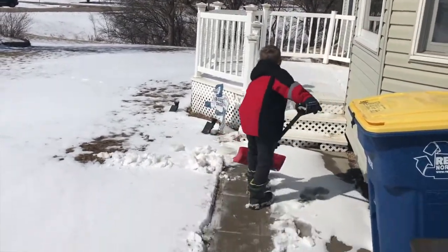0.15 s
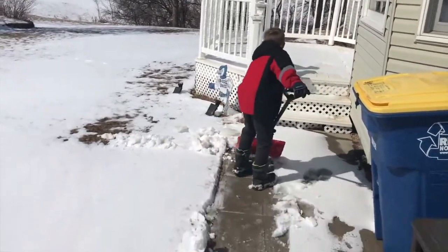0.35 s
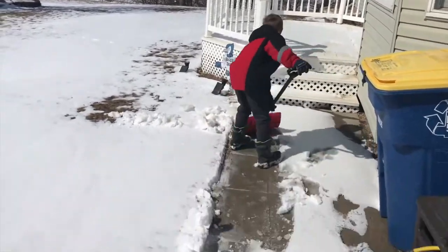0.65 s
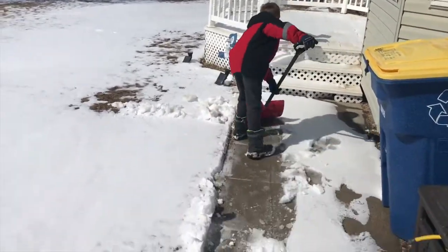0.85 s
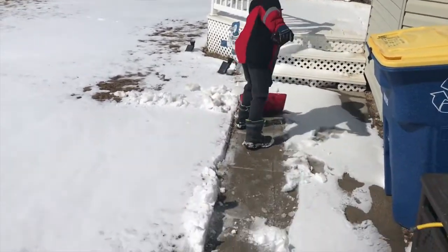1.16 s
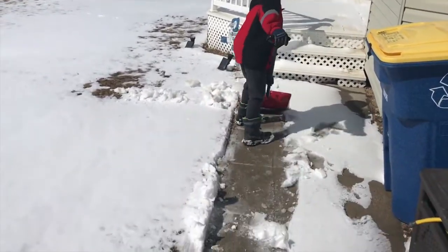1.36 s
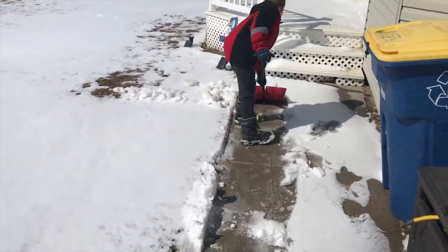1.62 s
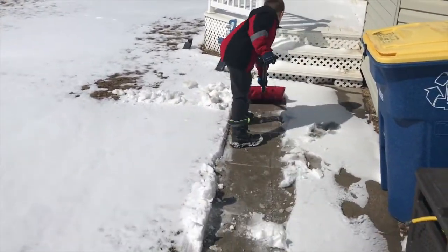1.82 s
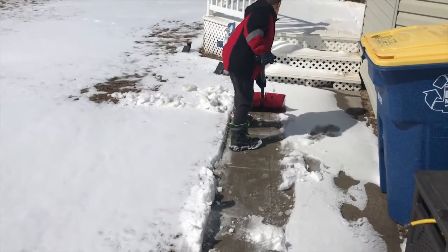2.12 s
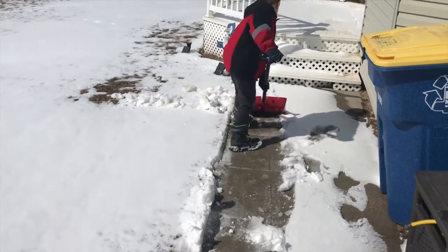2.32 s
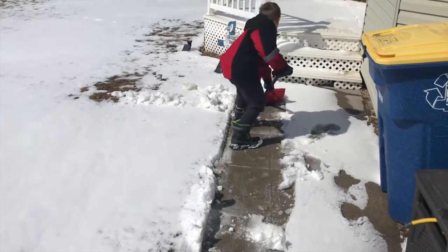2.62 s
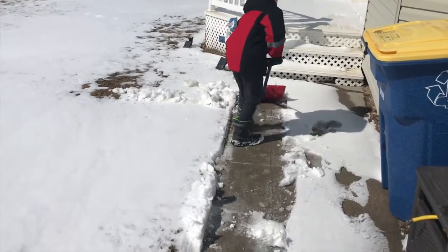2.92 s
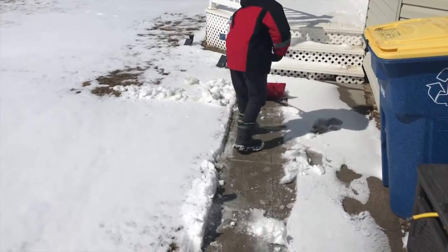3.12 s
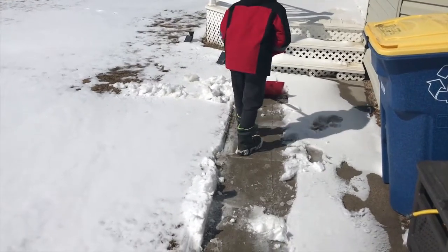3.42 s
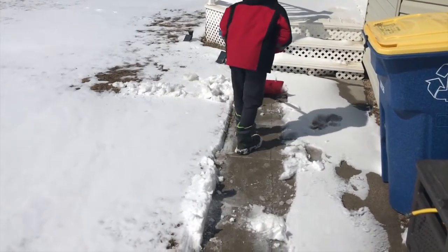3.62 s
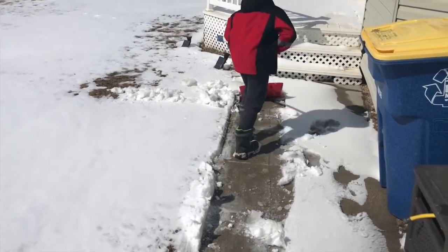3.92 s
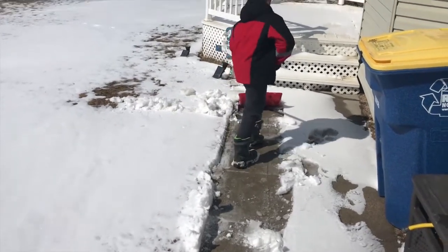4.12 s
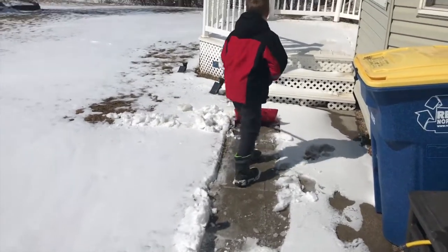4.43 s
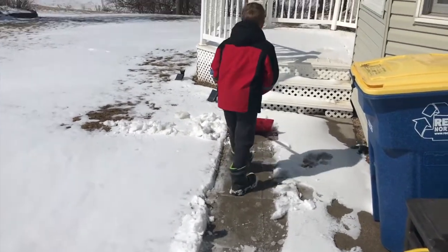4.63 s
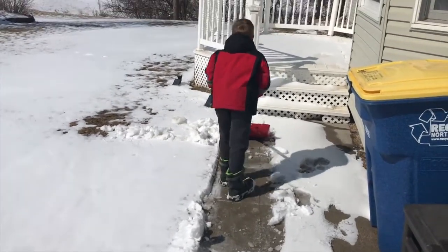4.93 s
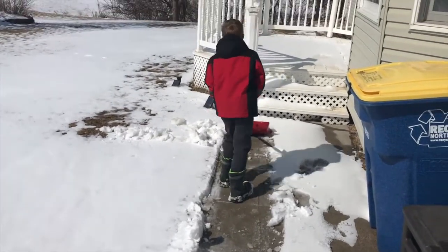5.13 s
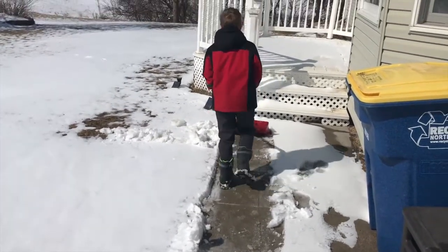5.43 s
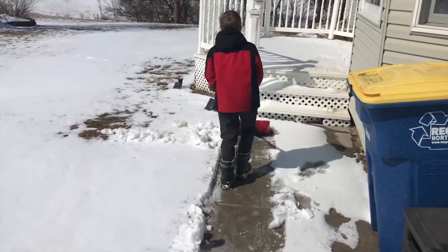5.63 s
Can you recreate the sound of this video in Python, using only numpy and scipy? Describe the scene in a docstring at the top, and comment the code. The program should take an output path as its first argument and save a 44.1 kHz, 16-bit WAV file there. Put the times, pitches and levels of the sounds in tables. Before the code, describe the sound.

A plastic snow shovel scrapes and knocks over rough concrete in short strokes, then quiet snow shuffles, a wind buffet and two weaker scrapes.

```python
"""A concrete path beside a house: a plastic snow shovel is scraped and dragged in short strokes, a few metres off.
Grit under the edge is a stream of random impulses that excites the damped modes of the blade; where the edge
catches on bumps, a tick and decaying chatter excite them too. Lighter shuffles through the snow crunch between
the strokes, short reflections follow, and a breeze buffets the microphone as low filtered noise with
single sinking swirls, over a faint outdoor hush of nearly steady noise."""
import sys
import numpy as np
from scipy import signal
from scipy.fft import rfft, irfft
from scipy.io import wavfile
from scipy.ndimage import uniform_filter1d

SR = 44100
rng = np.random.default_rng(int(sys.argv[2]) if len(sys.argv) > 2 else 0)


def wav_record(signal):
    """Record a signal, one row per channel, as 16-bit PCM in the file named by sys.argv[1]."""
    frames = np.transpose(np.atleast_2d(signal))
    bounded = np.clip(frames, -1, 1)
    # unit amplitude maps onto the largest positive 16-bit level
    quanta = np.round(bounded * 32767).astype(np.int16)
    wavfile.write(sys.argv[1], SR, quanta)


def volts(x):
    """Linear amplitude factor 10**(x/20) for a level x in dB, scalar or array-like."""
    e = np.asarray(x, float) / 20
    return 10 ** e


N = 254016

# the edge catching on bumps: (time [s], rattle level [dB], boom and knock above it [dB],
# grit above it [dB], most excited frequency [Hz])
CATCHES = [(0.066, -43, -1, 0, 2100), (0.297, -41, -8, 1.5, 2280), (0.526, -26.5, 1, -3, 260),
           (0.554, -23, 1, -7, 640), (0.607, -28, 5.5, -15, 387), (0.667, -13, -10, -8.5, 1120),
           (0.699, -20.5, 0.5, -25, 260), (0.78, -42, 2.5, -2, 340), (1.113, -33.5, 1, -18, 288),
           (1.148, -33, 0, -20, 603), (1.206, -36.5, 9.5, 4.5, 312), (1.509, -40.5, 0, -7, 980),
           (1.558, -17.5, -11, -13, 620), (1.601, -11, -1.5, -4, 260), (1.667, -13, -35, -8, 342),
           (1.699, -21.5, -2, 2, 310), (1.839, -37.5, -1.5, -2, 256), (2.115, -33, 6.5, -9, 990),
           (2.242, -32, -3, -3.5, 950), (2.286, -12, -16.5, -9.5, 1060), (2.355, -41, 8, -9, 343),
           (2.468, -23.5, 6, -8, 368), (2.496, -17.5, 4, -10, 322), (2.52, -23, -13, -25, 417),
           (2.549, -22.5, -1, -5, 378), (2.578, -21.5, -10, 1, 610), (2.647, -34.5, 2, -13, 1310),
           (2.953, -38.5, -9, -13, 242), (3.037, -42, -17, 8, 902), (3.214, -39, -11, 2, 242),
           (4.021, -42.5, -4, -18, 686), (4.115, -43.5, -23, 4.5, 1630), (4.911, -35.5, -17, -6, 1000),
           (5.079, -40, -11, -3, 1870), (5.117, -32.5, 0, -14, 381), (5.134, -33, -7, -1, 1030),
           (5.177, -29, -25, -3, 1870), (5.223, -29, -9, 1.5, 1900), (5.478, -46.5, -7, -8, 1910),
           (5.535, -48, -17, -17, 670), (5.651, -41.5, 2, -6, 440), (5.698, -41, -6, -4, 1370)]


def level(x):
    """Normalisation by effective value: scales a signal to rms 1."""
    return x / np.sqrt(np.mean(x ** 2))


def colour(x, points):
    """Minimum-phase filtering: the folded cepstrum of the log gain yields a causal response through (Hz, dB)."""
    hz, db = np.transpose(points)
    size = 8192
    grid = np.maximum(np.fft.rfftfreq(size, 1 / SR), 1)
    log_gain = np.log(volts(np.interp(np.log(grid), np.log(hz), db)))
    cepstrum = irfft(log_gain)
    cepstrum[1:size // 2] *= 2
    cepstrum[size // 2 + 1:] = 0
    response = irfft(np.exp(rfft(cepstrum)))
    return signal.fftconvolve(x, response)[:N]


def walk(rate):
    """Slow random modulation: Gaussian levels drawn rate times a second, joined by straight glides, rms 1."""
    hold = int(SR / rate)
    steps = np.repeat(rng.standard_normal(N // hold + 1), hold)
    return level(uniform_filter1d(steps, hold)[:N])


def shovel():
    """Modal radiation: stones and catches drive the blade modes by family; crushed grit adds broadband hiss."""
    # modes of the blade: (frequency [Hz], bandwidth [Hz], gain for steady noise [dB])
    blade_modes = [(262.4, 93, -5), (325, 76, -0.5), (393, 55, -4), (558, 70, -6), (577.4, 42, -3.5),
                   (688, 117, -6), (891, 75, -8.5), (1000, 52, -8), (1118, 68, -11), (1360, 97, -9),
                   (1481, 77, -10.5), (1595, 130, -7), (1853, 118, -10), (2068, 123, -11), (2333, 180, -12),
                   (2930, 510, -24.5), (3628, 84, -18), (3600, 330, -46), (4490, 99, -50),
                   (5940, 1000, -27.5), (6100, 800, -23), (6350, 500, -27)]
    # upper limits of boom, knock and rattle, with grit above: (frequency [Hz])
    family_limits = [460, 800, 3200]
    # relative spectrum of the crushed grit: (frequency [Hz], gain [dB])
    grit_spectrum = [(1470, -25.5), (2500, -1), (2970, -0.5), (3510, 2.5), (4850, -3.5), (6150, -1),
                     (10400, -9), (12400, -5.5), (15700, -12), (16500, -51)]

    levels_db = contact()
    judder_db = 1.49 * walk(60)  # the blade sticks and slips, all modes together
    stones = grains(rate=1800., scatter_db=5.0, most_db=6.0)
    fine = grains(rate=12000., scatter_db=4.0, most_db=14.0)
    rubs = [stones, stones, stones, level(fine + 0.25 * stones)]
    drag = [volts(db + judder_db) * rub for db, rub in zip(levels_db, rubs)]
    chance = rng.standard_normal((len(CATCHES), SR // 5))  # one 0.2 s noise per catch, shared by all modes

    blade = 0
    for k, (hz, width, db) in enumerate(blade_modes):
        family = np.searchsorted(family_limits, hz)
        wander = volts(2.19 * walk(35))  # the contact point moves, favouring one mode or another
        force = wander * drag[family] + catches(chance, hz, family)
        blade += (-1) ** k * ring(force, hz, width, db)

    grit = volts(0.48 * walk(30)) * drag[3] + catches(chance, 9000, 3)
    crushed = colour(grit, grit_spectrum) / np.std(colour(fine, grit_spectrum))
    coarse = signal.sosfilt(signal.butter(1, 5500., fs=SR, output="sos"), crushed)
    pressure_db = np.clip(levels_db[2] + 57.5, -15, 25)
    # the share of finest grains comes and goes, and shrinks under a heavy stroke
    finest_gain = volts(1.0 * walk(13) - 0.12 * pressure_db)
    blade += coarse + finest_gain * (crushed - coarse)
    # a small open blade radiates no deep bass
    return signal.sosfilt(signal.butter(3, 170., "high", fs=SR, output="sos"), blade)


def contact():
    """Addition of powers: pushes and shuffles sum to the levels in dB of boom, knock, rattle and grit."""
    # pressure of the edge on the path, one curve per push:
    # (time [s], edge rattle level [dB], scoop above the rattle [dB])
    strokes = [
        [(0.51, -64, 1), (0.53, -33.5, -8), (0.566, -31.5, 0), (0.62, -32.5, 4), (0.67, -29, 3),
         (0.706, -30, -6), (0.746, -65.5, 4), (0.816, -64.5, 13), (0.88, -64, 10)],
        [(1.06, -62, 2), (1.14, -51.5, 6.5), (1.16, -40.5, 4.5), (1.19, -41.5, 5.5), (1.249, -51, -5),
         (1.301, -51.5, 1.5), (1.43, -56.5, 2.5), (1.47, -72, -3)],
        [(1.505, -60, -5), (1.52, -46, -4), (1.595, -32, -1.5), (1.615, -25, -6), (1.641, -38, -10),
         (1.66, -25.5, 8.5), (1.685, -34, 5), (1.755, -37, -7), (1.821, -55.5, -19), (1.87, -68, -12)],
        [(2.03, -59, -9), (2.124, -46.5, -3.5), (2.208, -51, -6.5), (2.28, -52, 8), (2.305, -43.5, 1),
         (2.345, -48.5, -1), (2.355, -41.5, -11), (2.42, -82, -8)],
        [(2.43, -64, 5), (2.442, -47.5, -11), (2.462, -51, -3), (2.475, -31, -1), (2.49, -25, -9),
         (2.51, -37, 19.5), (2.532, -33, -5.5), (2.62, -44, -3.5), (2.68, -44.5, -8), (2.72, -69, -16)],
        [(4.99, -60.5, -14), (5.052, -57, -3), (5.138, -38.5, -12), (5.235, -39, -8.5), (5.343, -51, -15),
         (5.375, -69, -6)],
        [(5.64, -78, 2), (5.655, -63.5, 3), (5.687, -43.5, -10), (5.76, -44.5, -8)],
    ]
    # tilt of the blade, one row per push: (knock above its share of the scoop [dB],
    # grit above the rattle when that is at -51.5 dB [dB])
    tilts = [(-3, -5), (1, -4.5), (-1, -2.5), (0, -3.5), (-1, -2), (-1.5, -5), (0.5, -3.5)]
    # light shuffles through the snow: (loudest moment [s], rattle level [dB], swell [s], fade [s],
    # knock above the rattle [dB], grit above the rattle [dB])
    shuffles = [(0.008, -54, .02, 0.12, -6, -2), (0.2, -67, 0.11, 0.11, -1, 0.5),
                (0.297, -56.5, .006, 0.096, -7, 0.5), (0.42, -62, 0.04, 0.092, 1, -2),
                (0.915, -51.5, 0.054, 0.18, -15, 3), (1.015, -52.5, 0.066, 0.037, 2, -4.5),
                (1.871, -54.5, 0.12, 0.096, -20, 3.5), (1.985, -56.5, 0.07, 0.12, -10, -4),
                (2.786, -58, 0.098, 0.76, -5, -2.5), (2.96, -62, 0.12, 0.13, -8, 3),
                (3.045, -46, 0.018, .06, -4, -3.5), (3.12, -62.5, 0.023, 0.18, -14, 4),
                (3.239, -52.5, 0.041, 0.11, -13, 1), (3.515, -57.5, .2, 0.048, -4, -3),
                (3.65, -73.5, 0.15, 0.23, 5, 2.5), (3.912, -45, 0.17, 0.069, -3.5, -6.5),
                (4.03, -56, 0.054, 0.05, -10, -1), (4.158, -41, 0.036, .012, -13, -1),
                (4.36, -61.5, 0.035, 0.12, -8, 4.5), (4.455, -50, 0.11, 0.033, -19, -2.5),
                (4.51, -53, 0.022, 0.036, -18, -11), (4.568, -50.5, 0.053, 0.07, -14, -5),
                (4.7, -64, .08, 0.17, -10, -4), (4.875, -59, 0.024, .07, -16, 1),
                (4.95, -54.5, 0.058, 0.052, -23, 2), (5.41, -65, 0.026, 0.15, -11, -9)]
    swell_db, cut_db_per_s = 14.5, 900  # range of swell and fade; extra fall outside pushes and shuffles
    knock_share = 0.45  # the knock follows part of the scoop's swing
    grit_slope = -0.15  # a heavier edge rattles more than it hisses [dB per dB]

    t = np.arange(N) / SR
    power = np.full((4, N), 1e-12)
    for stroke, (knock_db, grit_db) in zip(strokes, tilts):
        s, db, scoop_db = np.transpose(stroke)
        outside = np.maximum(0, np.maximum(s[0] - t, t - s[-1]))
        edge_db = np.interp(t, s, db) - cut_db_per_s * outside
        boom_db = np.interp(t, s, scoop_db)
        hiss_db = grit_db + grit_slope * np.clip(edge_db + 51.5, -15, 30)
        power += volts(2 * (edge_db + [boom_db, knock_db + knock_share * boom_db, 0 * t, hiss_db]))
    for s, db, swell, fade, knock_db, grit_db in shuffles:
        outside = np.maximum(0, np.maximum(s - swell - t, t - s - fade))
        edge_db = db - swell_db * np.maximum((s - t) / swell, (t - s) / fade) - cut_db_per_s * outside
        family_db = np.array([knock_db - 9.5, knock_db, 0, grit_db])
        power += volts(2 * edge_db) * volts(2 * family_db)[:, None]
    return 10 * np.log10(power)


def grains(rate, scatter_db, most_db):
    """Shot noise: stones met at random moments, some bigger than the rest, none above a largest size."""
    met = rng.random(N) < rate / SR
    size_db = np.minimum(scatter_db * rng.exponential(size=N), most_db)
    return level(met * rng.choice([-1., 1.], N) * volts(size_db))


def catches(chance, hz, family):
    """Impact excitation of the mode at hz: a tick, then decaying chatter, stronger near the contact's pitch."""
    chatter_t60 = 0.056  # s
    tick_db = (15., 14., 13., 6.)[family]
    t = np.arange(chance.shape[1]) / SR
    force = np.zeros(N + len(t))
    for (s, db, scoop_db, grit_db, near_hz), noise in zip(CATCHES, chance):
        chatter = volts(-10.5) * noise * np.exp(-np.log(1000) * t / chatter_t60)
        chatter[0] += volts(tick_db)
        bonus_db = 9.0 * np.exp(-(np.log2(hz / near_hz) / 0.12) ** 2)  # width in octaves
        family_db = [scoop_db, scoop_db, 0, grit_db][family]
        i = int(s * SR)
        force[i:i + len(t)] += volts(db + family_db + bonus_db) * chatter
    return force[:N]


def ring(force, hz, width, db):
    """Damped resonance: a two-pole mode whose bandwidth sets its decay; db is its gain for steady noise."""
    r = np.exp(-np.pi * width / SR)
    w = 2 * np.pi * hz / SR
    gain = volts(db) * np.sqrt(2 * (1 - r * r))
    return gain * signal.lfilter([0, r * np.sin(w)], [1, -2 * r * np.cos(w), r * r], force)


def reflect(near):
    """Specular reflection: path and house wall return delayed, weaker copies, each also of the earlier ones."""
    # reflections: (delay [s], level [dB])
    echoes = [(.0016, -17.5), (.0085, -20.5), (.014, -27), (.023, -17)]
    for s, db in echoes:
        near = near + volts(db) * np.pad(near, (int(s * SR), 0))[:N]
    return near


def wind():
    """Turbulent pressure at the microphone port: low gusting noise, with single larger eddies as swirls."""
    # strength of the breeze: (time [s], level [dB])
    breeze = [(0.0, -51.5), (0.7, -65), (1.1, -57.5), (1.57, -55.5), (1.89, -65), (2.1, -51.5), (2.6, -54),
              (2.9, -49), (3.14, -39.5), (3.4, -49.5), (3.7, -53.5), (4.0, -55.5), (4.3, -52.5),
              (4.75, -59), (5.0, -59), (5.4, -60.5), (5.76, -59)]
    # relative spectrum of the turbulence: (frequency [Hz], gain [dB])
    turbulence = [(12, -49), (20, -22), (49, -1.5), (70, -5), (233, -20.5), (278, -37), (304, -63),
                  (400, -67), (520, -75), (880, -120)]
    # single eddies: (onset [s], peak level [dB], nominal frequency [Hz], duration [periods of that frequency])
    buffets = [(1.119, -46.5, 76.4, 3.8), (1.415, -44.5, 61.5, 3.4), (2.139, -39.5, 61, 4),
               (2.228, -36, 91.5, 5.2), (2.697, -36, 95, 5.3), (2.936, -30, 92, 5.2),
               (3.029, -40, 72.2, 3.2), (3.088, -34, 57, 2.5), (3.16, -25, 71.3, 6.2),
               (3.269, -36, 66.9, 1.6), (3.432, -35, 53, 3.4), (3.508, -33, 95, 3.8)]
    s, db = np.transpose(breeze)
    t = np.arange(N) / SR
    gusts = level(colour(rng.standard_normal(N), turbulence) * volts(3.94 * walk(5.2)))
    out = gusts * volts(np.interp(t, s, db))
    for (s, db, hz, cycles), turn in zip(buffets, rng.random(len(buffets))):
        u = np.clip((t - s) * hz / cycles, 0, 1)  # progress of the eddy
        swirl = cycles * (1.217 * u - 0.39 * u ** 2)  # the eddy slows as it passes, so its pitch sinks
        swell = np.sin(np.pi * u ** 0.67) ** 2
        out += volts(db) * swell * np.sin(2 * np.pi * (swirl + turn))
    return out


def hush():
    """Stationary filtered noise: distant outdoor sound, its level drifting only slightly."""
    # relative spectrum of the hush: (frequency [Hz], gain [dB])
    hush_spectrum = [(59, -17), (100, 4), (577, 2), (1480, -11), (1830, -11), (2310, -17.5), (3400, -17.5),
                     (10500, -24.5), (12500, -20.5), (15500, -25), (16500, -71)]
    return volts(-60 + 1.4 * walk(2.26)) * level(colour(rng.standard_normal(N), hush_spectrum))


def scene():
    """Superposition: the shovel with its reflections, the wind and the hush add as pressures in one channel."""
    return (reflect(shovel()) + wind() + hush())[None]


def low_pass(x):
    """Removes everything above the highest recorded frequency."""
    return signal.sosfilt(signal.butter(12, 17000, fs=SR, output="sos"), x)


def record(dry):
    """Single-point pickup: one phone microphone takes the finished mix as a single channel."""
    return low_pass(dry)


dry = scene()
out = record(dry)
wav_record(out)
```